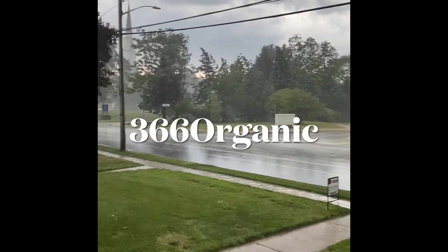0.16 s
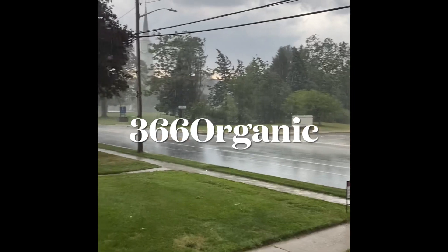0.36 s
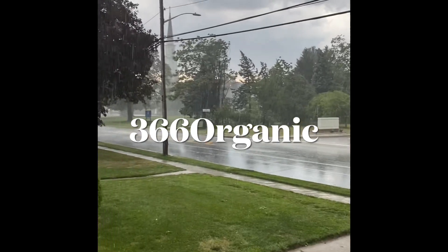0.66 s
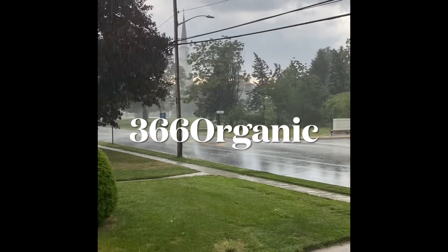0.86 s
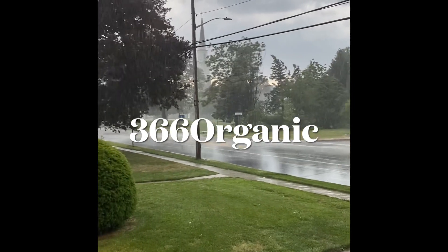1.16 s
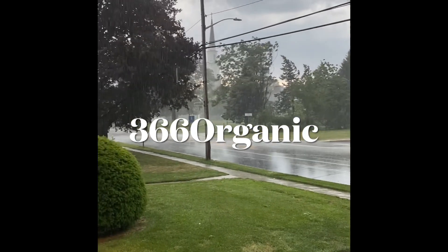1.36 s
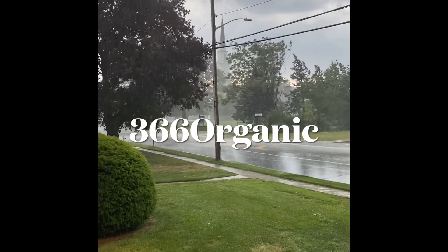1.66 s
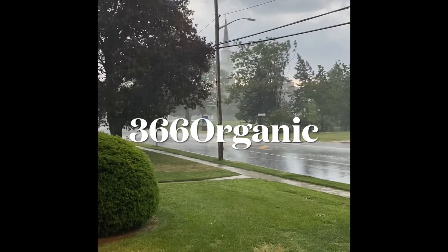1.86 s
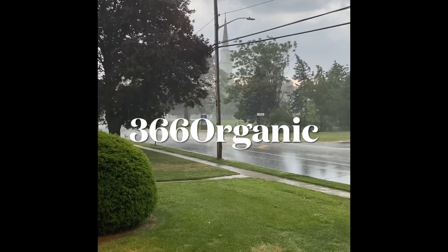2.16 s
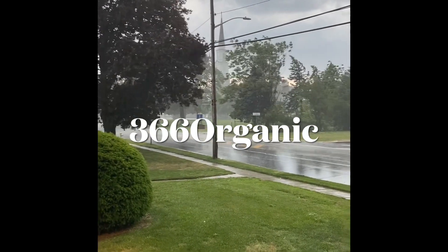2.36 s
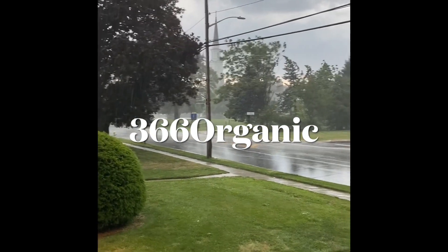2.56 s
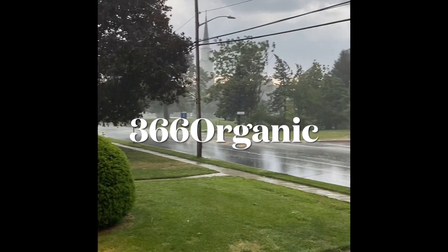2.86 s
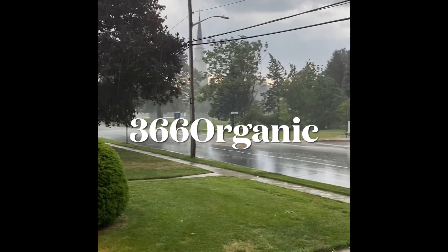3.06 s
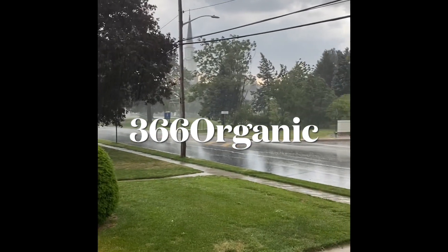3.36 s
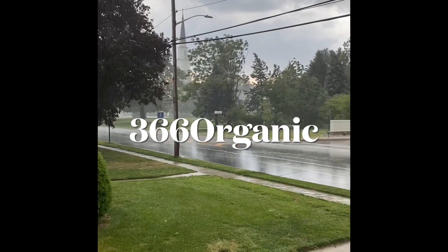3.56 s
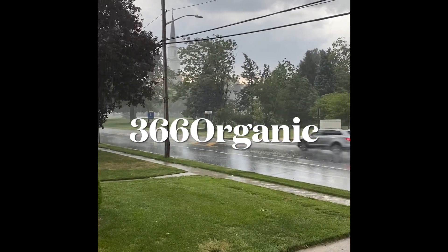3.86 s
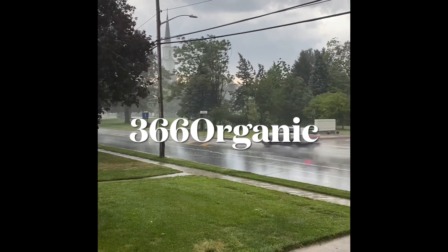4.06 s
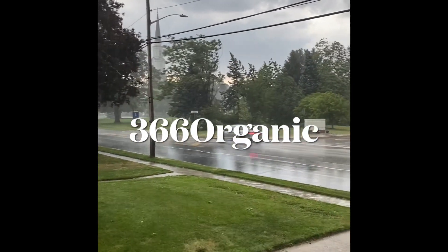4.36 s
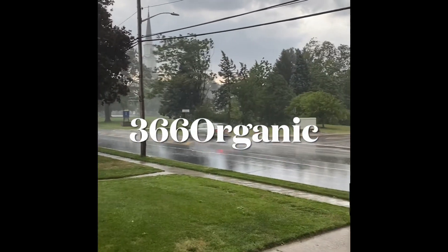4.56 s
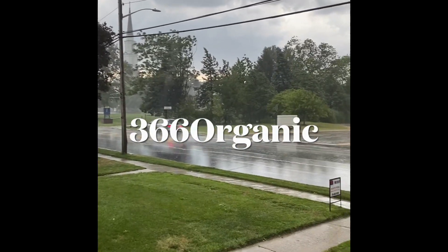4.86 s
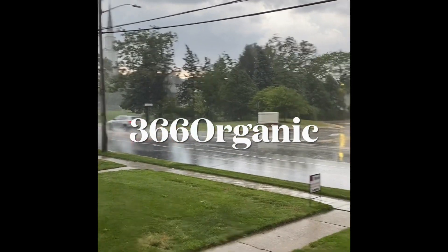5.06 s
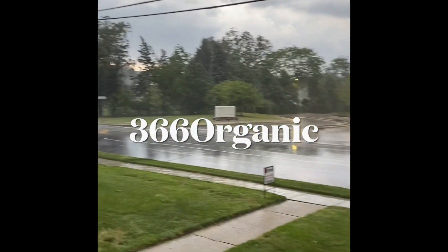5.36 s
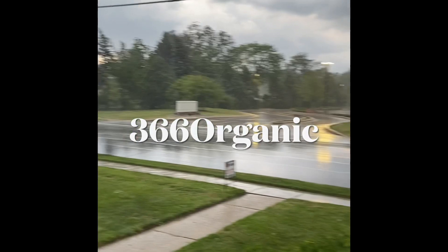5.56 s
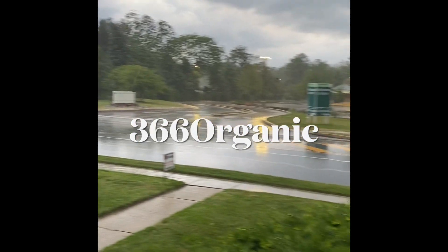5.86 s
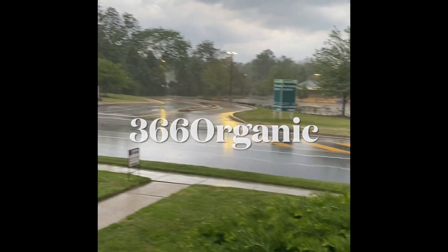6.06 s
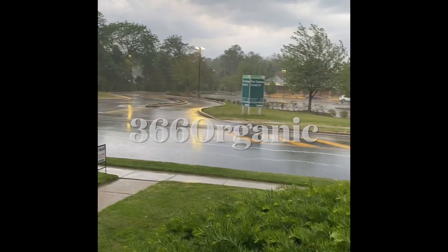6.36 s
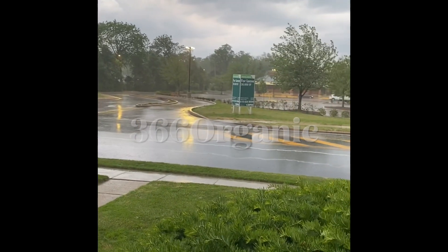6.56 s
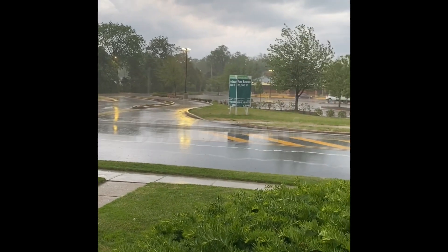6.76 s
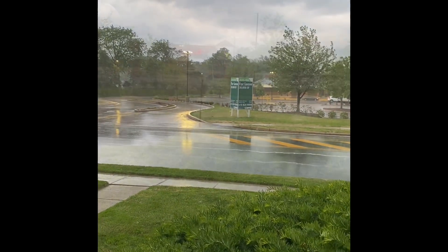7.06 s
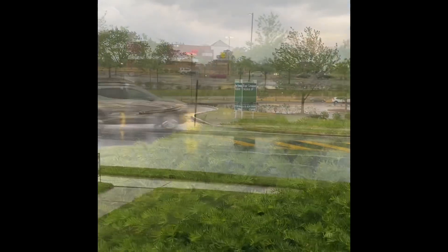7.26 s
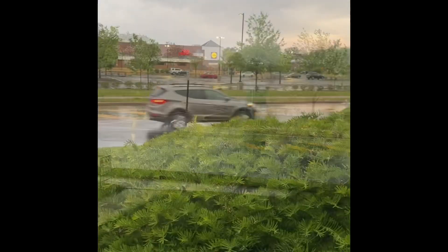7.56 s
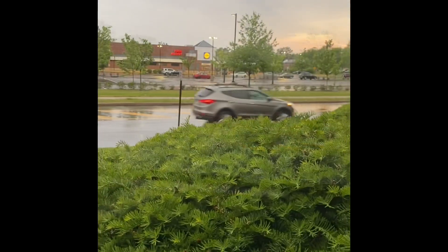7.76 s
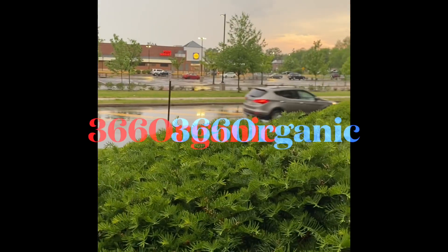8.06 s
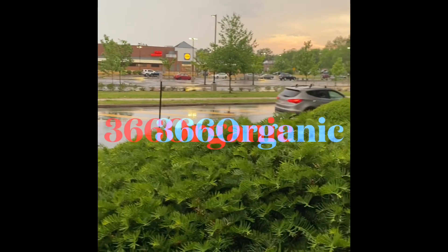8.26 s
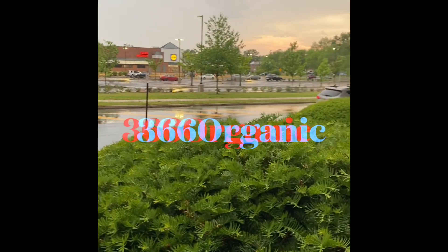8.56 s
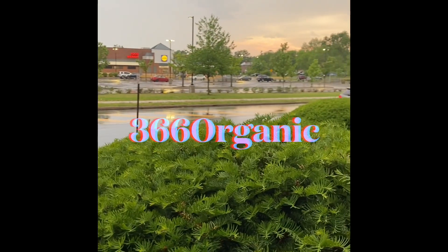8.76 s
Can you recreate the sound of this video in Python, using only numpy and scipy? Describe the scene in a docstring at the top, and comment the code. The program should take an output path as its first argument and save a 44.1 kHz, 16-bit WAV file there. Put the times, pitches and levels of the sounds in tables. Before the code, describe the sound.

Stereo handheld perspective from a front garden beside a wet street: continuous rain wash with fine patter and low traffic boom. Tyre roar and bright puddle spray build to a close pass, then trail away in long watery swishes. Sharp close drops click early and again after six seconds. Finally a slower car pulls away, its softer tyre rush and exhaust hum rising and dying down.

```python
"""Heavy rain from start to end (noise wash plus sparse clicks) over a deep road rumble, at a house front.
From the start a car nears on the wet road: filtered noise for roar, puddle spray and swishes, sines for engine.
It is nearest at 3.7 s; an added delayed copy, the echo of a wall, then colours its tyres as it leaves.
Drops land close by near 0.8 s and 6.3 s, as decaying noise splats.
From 7 s a slower car pulls away: swelling tyre and exhaust noise, surges of spray, a rising engine note."""
import sys
import numpy as np
from scipy import signal
from scipy.io import wavfile
from scipy.ndimage import uniform_filter1d

SR = 44100
rng = np.random.default_rng(int(sys.argv[2]) if len(sys.argv) > 2 else 0)


def output_pcm(signal):
    """Save a mono or channel-first signal as 16-bit PCM at the path in sys.argv[1].

    Samples are clipped to [-1, 1] before scaling.
    """
    pcm = np.clip(np.atleast_2d(signal).T, -1, 1) * 32767
    wavfile.write(sys.argv[1], SR, np.round(pcm).astype(np.int16))


N = 393327
TIME = np.arange(N) / SR
EDGE_HZ = 15800

# passing car: nearest moment, speed, nearest distance
PASS_S, SPEED_M_PER_S, DISTANCE_M = 3.7, 13.8, 9.1
# its roar and steady mist at the nearest moment; corner of the mist's treble roll-off
ROAR_DB, MIST_DB, MIST_HZ = -32, -36.5, 5150
# late drop of its roar and mist: start, fade, change of level
DROP_S, DROP_FADE_S, DROP_DB = 7.04, 0.25, -10.5
SPLASH_RISE_S, SPLASH_FALL_S = 0.079, 0.22
SLOW_TYRES_DB, EXHAUST_DB = -38.5, -42

# spectral shapes, relative [f/Hz, level/dB]: passing car's tyres and spray
ROAR_SPECTRUM = [(150, -23), (330, -12.5), (490, -5.5), (620, -8), (850, 1), (1200, 0), (1900, -0.5),
                 (2600, -4.5), (3400, -7), (4400, -11), (5300, -8.5), (7000, -17), (12000, -71)]
SPRAY_SPECTRUM = [(200, -23), (480, -4), (1000, -8), (1900, -9), (2600, 1.5), (3500, 0.8), (4400, -3),
                  (5300, -1), (7000, -3.5), (9000, -3.5), (12000, -6), (15800, -9)]
# slow car's tyres, spray and exhaust [f/Hz, level/dB]
SLOW_TYRES_SPECTRUM = [(100, -29), (420, 0.5), (620, -2.5), (760, 0.5), (910, 5.5), (1100, 0.5), (1700, 0),
                       (2600, -3.5), (3400, -7.5), (4400, -7), (5300, -4.5), (7000, -14), (9000, -21),
                       (12000, -27), (15800, -36)]
SLOW_SPRAY_SPECTRUM = [(1500, -23), (3400, -8), (5200, 0.5), (6000, -1), (7000, -4), (9000, -6.5),
                       (12000, -15), (15800, -18)]
EXHAUST_SPECTRUM = [(60, -38), (110, -19), (160, -3), (195, 1), (228, 1.5), (255, 1.5), (295, -2.5),
                    (340, -27), (450, -19), (900, -44)]
# rain; road boom; lighter road rumble [f/Hz, level/dB]
RAIN_SPECTRUM = [(30, -11.5), (130, -1.5), (250, -5), (400, -5), (620, -10), (850, -7.5), (1900, -11),
                 (2600, -9), (3400, -13), (5300, -16), (7000, -23), (9000, -23), (12000, -28), (15800, -35)]
BOOM_SPECTRUM = [(20, -36), (35, -21), (47, -3.5), (56, 10.5), (65, 5.5), (76, -5), (100, -28),
                 (160, -32.5)]
UPPER_RUMBLE_SPECTRUM = [(40, -31), (65, -15), (85, 2), (130, -2), (165, -8), (250, -20), (400, -14),
                         (700, -52)]

# passing car's roar above the 1/r law [start/s, rise/s, hold/s, fall/s, level/dB]
ROAR_SWELLS = [(4.65, 0.21, 1, 0.52, 4), (6.3, 0.7, .2, 0.23, 5)]
# spray burst from each puddle [start/s, length/s, level/dB, treble roll-off f/Hz]
PUDDLES = [(0.643, 0.2, -38.5, 8000), (1.2, 0.19, -36.5, 5500), (1.41, 0.34, -37, 11500),
           (1.677, 0.49, -35.5, 9200), (2.13, 0.2, -35, 19000), (2.44, 0.2, -33, 11700),
           (2.708, 0.1, -33, 12000), (2.947, 0.58, -35, 16000), (3.6, 0.17, -34, 10500),
           (4.9, 0.22, -41.5, 3750), (5.382, 0.32, -31, 3680), (5.75, 0.27, -35.5, 2600)]
# tyres in sheets of water
# [start/s, rise/s, hold/s, fall/s, level/dB, start centre f/Hz, end centre f/Hz, half-width at -6 dB f/Hz]
SWISHES = [(1.35, 0.27, .2, .35, -45, 2470, 2640, 280), (1.45, 0.3, 0.27, .5, -43, 2900, 3500, 900),
           (2.25, 0.33, .6, .4, -42, 2760, 2630, 130), (3.25, 0.3, 0.42, .3, -41, 2640, 2500, 125),
           (3.047, 0.25, 0.22, .45, -39.5, 1950, 1550, 650), (3.55, 0.18, .1, .2, -51, 4020, 3920, 200),
           (3.9, 0.25, 0.48, .3, -49, 3000, 3000, 650), (4.65, 0.32, 0.23, .3, -43, 1310, 1280, 280),
           (4.7, 0.34, 0.24, .25, -37, 2400, 2400, 1200), (5.1, 0.34, 0.55, .27, -38.5, 2600, 2500, 620),
           (5.6, .4, 0.8, .4, -50.5, 1340, 1340, 280), (5.3, .35, 0.39, 0.32, -49, 2450, 2430, 118),
           (6.1, 0.36, 0.53, .4, -51, 2510, 2460, 151)]
# wall's echo of the tyres [t/s, delay/ms, strength/0-1]
WALL_ECHO = [(4.0, 2.2, .1), (4.5, 2.39, .25), (4.8, 2.47, .35), (5.1, 2.52, .48), (5.4, 2.53, .55),
             (5.7, 2.48, .68), (6.0, 2.44, .65), (6.3, 2.44, .55), (7.1, 2.48, .65), (7.5, 2.5, .3)]
# slow car's envelope [start/s, rise/s, hold/s, fall/s]
PULL_AWAY = (7.046, 0.76, 0.76, 1.4)
# surges of its spray [start/s, rise/s, hold/s, fall/s, level/dB]
SLOW_SURGES = [(7.248, 0.62, .15, 0.52, -43.5), (8.35, 0.38, .3, .4, -41.5)]
# engines and exhausts: traffic throb, passing car's hum and exhaust, slow car nearing and pulling away
# [start/s, rise/s, hold/s, fall/s, level/dB, start f/Hz, glide/(Hz/s), roughness/0-1]
ENGINE_NOTES = [ (0, 0.083, 0.22, 0.23, -41, 64, -2, .4), (1.047, 0.19, 0.28, .15, -38, 58, -5.5, 0.2),
                (1.699, 0.23, 0.66, .2, -42.5, 57, 8.5, .4), (0.103, .06, .1, 0.46, -42.5, 142, -5, .5),
                (1.45, 0.28, 0.54, .2, -43.5, 102, 1, 0.5), (2.155, 0.33, 0.38, 0.18, -41, 103.4, 7, 0.46),
                (2.746, .2, 0.6, .35, -46.5, 132, -3, 0.5), (3.054, 0.28, 0.22, .2, -41.5, 111, 1, 0.7),
                (3.75, 0.23, .45, .25, -44, 105.5, -7, 0.3), (3.5, 0.17, 0.73, .2, -38.5, 67, 0, .2),
                (4.454, 0.28, 0.18, 0.13, -35.5, 59, -1, 0.4),
                (5.004, 0.17, 0.086, .25, -40.5, 60, -0.5, 0.5),
                (6.703, 0.15, 0.15, 0.23, -43, 59.5, -1.5, 0.2),
                (6.738, 0.15, 0.093, 0.25, -46.5, 272.4, -1, .35),
                (7.429, 0.22, 1, 0.46, -40, 117.7, 8.5, .55), (7.7, 0.42, .2, .25, -44.5, 304, -20.5, 0.5),
                (8.198, 0.14, .6, .3, -47.5, 285.4, -2.5, .45),
                (8.304, .25, .3, 0.26, -45.5, 227.4, -3, 0.47)]
# drops landing next to the microphone [t/s, level/dB, 1 dB under the splat's peak]
NEAR_DROPS = [(.6635, -30), (.9229, -37), (6.178, -25), (6.2395, -35), (6.3295, -28), (6.341, -34),
              (6.3865, -32), (7.0704, -38)]
# rain strength [t/s, level/dB]
SHOWER = [(0, -35), (.75, -36), (1.12, -37.5), (1.7, -36), (5.5, -37), (6.4, -39), (8.92, -38)]
# road rumble [t/s, boom level/dB, upper rumble level/dB]
ROAD_LEVELS = [(0, -38.5, -43), (1.1, -39, -40), (2.2, -39.5, -45.5), (3.3, -40.5, -44.5), (4.6, -41, -41),
               (5.5, -42, -44), (6.9, -41, -40.5), (7.6, -43, -48.5), (8.92, -45, -55)]

# likeness of the two ports [f/Hz, likeness/0-1]
PORT_LIKENESS = [(130, 1), (290, .98), (620, .58), (1200, .8), (1900, .93), (2500, .76), (3200, .4),
                 (4000, .42), (4650, .08), (5400, .68), (6400, .76), (7000, .99), (7700, .99), (8400, .72),
                 (9300, .66), (10000, .98), (11000, .98), (12100, .62), (13000, .99), (14300, .99),
                 (15000, .6), (15800, .8)]
# phase by which left leads right [f/Hz, phase/rad]
PORT_LEAD = [(200, 0), (620, -.35), (1120, -.3), (2000, 0), (2900, -.75), (3800, 0), (5100, 0), (6200, 1.8),
             (7000, 3.05), (7900, 3.25), (9800, 6.2), (11500, 6.5), (12600, 9.3), (14400, 9.5),
             (15800, 12.3)]
# port balance [f/Hz, left minus right level/dB]
PORT_BALANCE = [(100, 0.1), (500, -0.3), (1000, -0.7), (2400, 0.2), (3600, -2.8), (5000, 0), (8000, 0)]
# favoured side by microphone heading [t/s, left minus right level/dB]
HEADING = [(0, .5), (2.3, -0.7), (4.5, -0.6), (5.9, .5), (7.8, -2), (8.92, 0.6)]
# standing resonances of the house front [f/Hz, width/Hz, level/dB]
PORCH_RESONANCES = [(348, 14, -1.5), (770, 170, 0.6), (2600, 230, 1)]


def passing_car():
    """Tyre roar, spray and swishes follow the car; the wall's echo combs all but the single droplets."""
    swell_db = sum(db * swell(*shape) for *shape, db in ROAR_SWELLS)
    tyre_gain = closeness() * gain_of(ROAR_DB + swell_db)
    roar = tyre_gain * rush(ROAR_SPECTRUM, patchy_db=2.2, flicker_db=.5, wall=True, size=2048)
    spray_gain, reach_hz = thrown_water()
    mist = rush(SPRAY_SPECTRUM, patchy_db=2.05, flicker_db=1.4, wall=True, dull_hz=reach_hz, size=1024)
    droplet_gain = np.minimum(reach_hz / 12000, 1) ** 3  # droplets stand out when the spray is bright
    droplets = droplet_gain * patter(SPRAY_SPECTRUM, drops_per_s=1300, spread_db=5.0, low_hz=7000)
    spray = spray_gain * (mist + gain_of(-12.5) * droplets)
    return roar + spray + sum(swish(*row) for row in SWISHES)


def closeness():
    """Pressure falls as 1/r from 1 at the nearest point; a late quick fade lowers the roar and mist."""
    distance_m = np.hypot(DISTANCE_M, SPEED_M_PER_S * (TIME - PASS_S))
    return DISTANCE_M / distance_m * gain_of(DROP_DB * ramp(DROP_S, DROP_FADE_S))


def thrown_water():
    """Mist and puddle bursts add in power; power-weighted mean of log f sets the treble roll-off in Hz."""
    power = (gain_of(MIST_DB) * closeness()) ** 2
    weighted_log_hz = power * np.log(MIST_HZ)
    for start_s, length_s, db, hz in PUDDLES:
        settling = np.exp(-np.maximum(TIME - start_s - length_s, 0) / SPLASH_FALL_S)
        burst_power = (gain_of(db) * ramp(start_s, SPLASH_RISE_S) * settling) ** 2
        power = power + burst_power
        weighted_log_hz = weighted_log_hz + burst_power * np.log(hz)
    return np.sqrt(power), np.exp(weighted_log_hz / power)


def swish(start_s, rise_s, hold_s, fall_s, db, hz, end_hz, half_width_hz):
    """Tyres cut a film of water: hiss gathered in one gliding resonance."""
    f = np.geomspace(100, EDGE_HZ, 300)
    band_db = -20 * np.log10(1 + ((f - hz) / half_width_hz) ** 2)
    stretch = (end_hz / hz) ** ramp(start_s, rise_s + hold_s + fall_s)
    spectrum = np.column_stack([f, band_db])
    hiss = rush(spectrum, patchy_db=2.0, flicker_db=0.3, wall=True, stretch=stretch, size=1024)
    return swell(start_s, rise_s, hold_s, fall_s, db) * hiss


def slow_car():
    """Wet tyres and exhaust rush swell together as the car pulls away; its spray surges."""
    tyres = gain_of(SLOW_TYRES_DB) * rush(SLOW_TYRES_SPECTRUM, patchy_db=2.9, flicker_db=1.0, size=1024)
    exhaust = gain_of(EXHAUST_DB) * rush(EXHAUST_SPECTRUM, patchy_db=0.5, flicker_db=1.0, size=4096)
    surges = sum(swell(*row) for row in SLOW_SURGES)
    spray = surges * rush(SLOW_SPRAY_SPECTRUM, patchy_db=3.5, flicker_db=-0.5, size=512)
    return swell(*PULL_AWAY) * (tyres + exhaust) + spray


def engine_notes():
    """Engine and exhaust notes swell in and out, each on its own linear glide."""
    total = 0
    for start_s, *shape, hz, glide_hz_per_s, rough in ENGINE_NOTES:
        note_hz = hz + glide_hz_per_s * (TIME - start_s)
        note = hum(note_hz, rough, overtone_db=-27, waver=.007, throb_db=1.0)
        total = total + swell(start_s, *shape) * note
    return total


def hum(hz, rough, overtone_db, waver, throb_db):
    """Engine note and octave, unsteady in speed and strength; uneven firing roughens it."""
    angle = 2 * np.pi * np.cumsum(hz * (1 + waver * wander(hz=12))) / SR
    note = np.sin(angle) + gain_of(overtone_db) * np.sin(2 * angle)
    rasp = (wander(hz=23.92) * np.sin(angle) + wander(hz=24) * np.cos(angle)) / np.sqrt(2)
    level = np.sqrt(2 / (1 + rough ** 2)) * gain_of(throb_db * wander(hz=10))
    return level * (note + rough * rasp)


def near_drops(decay_s=0.0013, low_hz=5500):
    """Each close drop is a short decaying burst of high-passed noise."""
    out, t = np.zeros((2, N)), np.arange(256) / SR
    high_pass = signal.butter(2, low_hz, "high", fs=SR, output="sos")
    for start_s, db in NEAR_DROPS:
        burst = rng.standard_normal((2, len(t))) * np.exp(-t / decay_s)
        splat = signal.sosfilt(high_pass, burst)
        out[:, round(start_s * SR):][:, :len(t)] += gain_of(db + 1) * splat / abs(splat).max()
    return out


def rain():
    """Countless far drops merge into a wash; nearer ones patter singly on leaves."""
    wash = rush(RAIN_SPECTRUM, patchy_db=0.98, flicker_db=0.67, size=1024)
    leaves = patter(RAIN_SPECTRUM, drops_per_s=700, spread_db=4.0, low_hz=4000)
    return gain_of(follow(SHOWER)[0]) * (gain_of(-.5) * wash + gain_of(-14) * leaves)


def road_rumble():
    """Traffic as a deep, nearly mono boom with a lighter rumble above it."""
    boom_db, upper_db = follow(ROAD_LEVELS)
    boom = rush(BOOM_SPECTRUM, patchy_db=0.0, flicker_db=0.5, size=8192)
    upper = rush(UPPER_RUMBLE_SPECTRUM, patchy_db=1.5, flicker_db=1.3, size=8192)
    return gain_of(boom_db) * boom + gain_of(upper_db) * upper


def rush(spectrum, patchy_db, flicker_db, wall=False, dull_hz=None, stretch=None, size=2048):
    """Stereo noise, patchy and flickering; optional wall comb, treble roll-off and frequency stretch."""
    hop = size // 4
    hz, t = np.fft.rfftfreq(size, 1 / SR), np.arange(N // hop + 5) * hop / SR
    a, b, c, d, patches, flicker = rng.standard_normal((len(t), len(hz), 6)).T
    # axis 0 frequency, axis 1 time: patches last, flicker is broadband and quick
    patches = evened(uniform_filter1d(uniform_filter1d(patches, size=5, axis=0), size=24, axis=1))
    flicker = evened(uniform_filter1d(uniform_filter1d(flicker, size=400, axis=0), size=2, axis=1))
    ratio = 1 if stretch is None else np.interp(t, TIME, stretch)
    colour_db = read(spectrum, hz[:, None] / ratio) + porch(hz)[:, None]
    level_db = colour_db + patchy_db * patches + flicker_db * flicker
    z = evened(ports(a + 1j * b, c + 1j * d, hz) * gain_of(level_db))
    if wall:
        delay_ms, strength = follow(WALL_ECHO, t)
        echo = strength * np.exp(-2j * np.pi * hz[:, None] * delay_ms / 1000)
        z = z * (1 + echo) / np.sqrt(1 + strength ** 2)
    if dull_hz is not None:
        z = z / np.sqrt(1 + (hz[:, None] / np.interp(t, TIME, dull_hz)) ** 4)
    noise = signal.istft(z, nperseg=size, noverlap=size - hop)[1][:, :N]
    return noise * np.sqrt(6 / size)


def patter(spectrum, drops_per_s, spread_db, low_hz):
    """Separate drops, rms 1: sparse clicks, mostly small, coloured and kept to the treble."""
    sizes = gain_of(spread_db * np.minimum(rng.exponential(1, (2, N)), 4))
    hits = rng.random((2, N)) < drops_per_s / SR
    clicks = sizes * rng.choice([-1, 1], (2, N)) * hits
    hz, _, z = signal.stft(clicks, SR, nperseg=512)
    colour = gain_of(read(spectrum, hz)) * hz ** 2 / (hz ** 2 + low_hz ** 2)
    return evened(signal.istft(ports(*z, hz) * colour[:, None], SR)[1][:, :N])


def ports(first, second, hz):
    """Two unrelated spectra become left and right: partly alike, offset in phase and level by frequency."""
    same = np.clip(read(PORT_LIKENESS, hz), 0, 1)[:, None]
    turn = np.exp(-1j * read(PORT_LEAD, hz))[:, None]
    lean = gain_of(read(PORT_BALANCE, hz) / 2)[:, None]
    right = (same * first + np.sqrt(1 - same ** 2) * second) * turn / lean
    return np.array([first * lean, right])


def porch(hz, ripple_db=1.06):
    """Colour in dB: shared resonances plus a fine random ripple, drawn anew for each noise layer."""
    peaks_db = sum(db / (1 + (2 * (hz - f) / width_hz) ** 2) for f, width_hz, db in PORCH_RESONANCES)
    ripple = sum(np.cos(2 * np.pi * hz * delay_s) for delay_s in rng.uniform(.006, .02, 16))
    return peaks_db + ripple_db * evened(ripple)


def swell(start_s, rise_s, hold_s, fall_s, db=0):
    """Envelope of linear attack, hold and release."""
    return gain_of(db) * (ramp(start_s, rise_s) - ramp(start_s + rise_s + hold_s, fall_s))


def ramp(start_s, length_s, t=TIME):
    """Linear rise from 0 to 1."""
    return np.clip((t - start_s) / length_s, 0, 1)


def wander(hz):
    """Slow random curve, rms 1: linear between random knots 0.5 / hz apart."""
    knots_s = np.arange(0, TIME[-1] + 1, .5 / hz)
    return evened(np.interp(TIME, knots_s, rng.standard_normal(len(knots_s))))


def follow(rows, t=TIME):
    """Columns of a time table, interpolated at t."""
    s, *columns = np.transpose(rows)
    return [np.interp(t, s, column) for column in columns]


def read(points, hz):
    """Frequency table, interpolated on a log axis."""
    f, value = np.transpose(points)
    return np.interp(np.log(hz + 1), np.log(f + 1), value)


def evened(x):
    """Scales to rms 1."""
    return x / np.sqrt(np.mean(abs(x) ** 2) + 1e-20)


def gain_of(db):
    """Decibels to amplitude."""
    return 10 ** (np.asarray(db) / 20)


def scene():
    """Rain and traffic lean with the microphone's heading; the road rumble does not."""
    lean_db = follow(HEADING)[0] / 2
    leaning = passing_car() + slow_car() + engine_notes() + near_drops() + rain()
    return leaning * gain_of([lean_db, -lean_db]) + road_rumble()


def record(dry):
    """The recorder's band limit: linear-phase low-pass."""
    low_pass = signal.firwin(511, EDGE_HZ, window=("kaiser", 9), fs=SR)
    return signal.oaconvolve(dry, low_pass[None], "same")


dry = scene()
out = record(dry)
output_pcm(out)
```